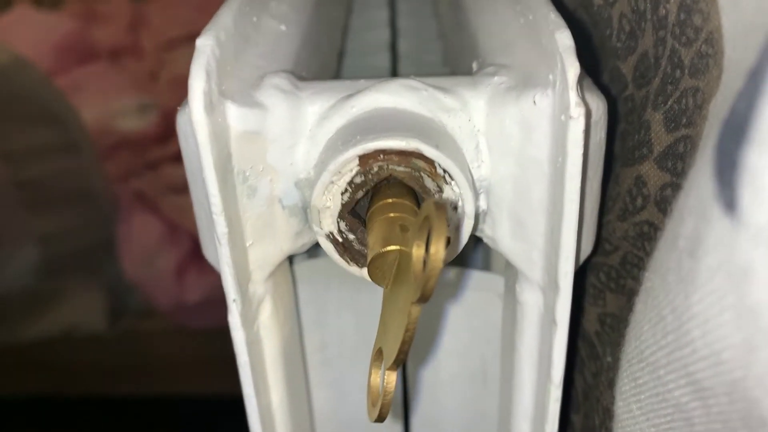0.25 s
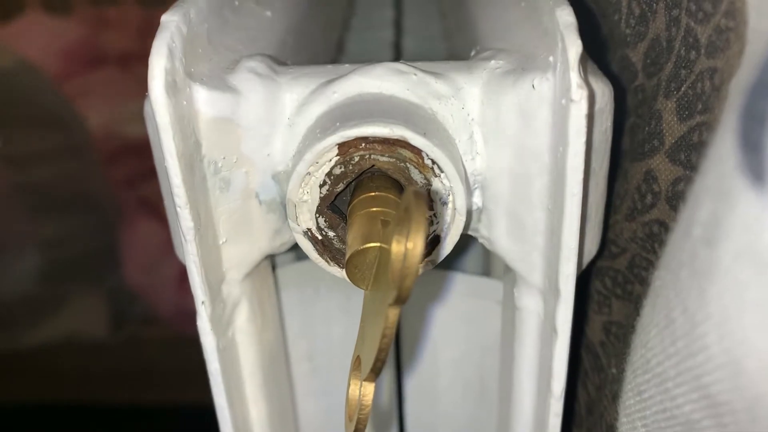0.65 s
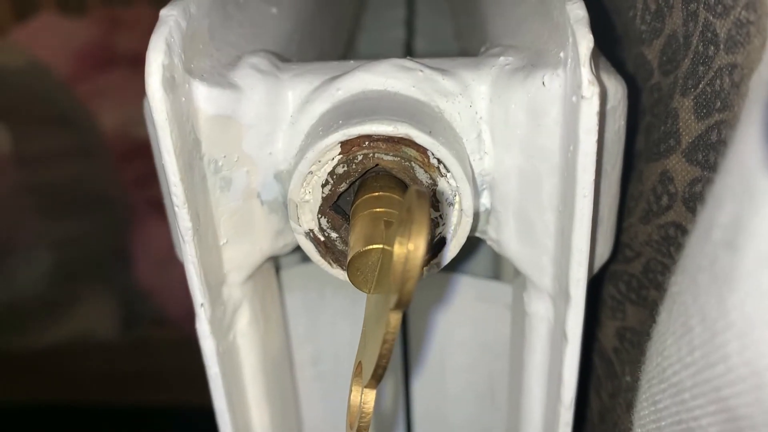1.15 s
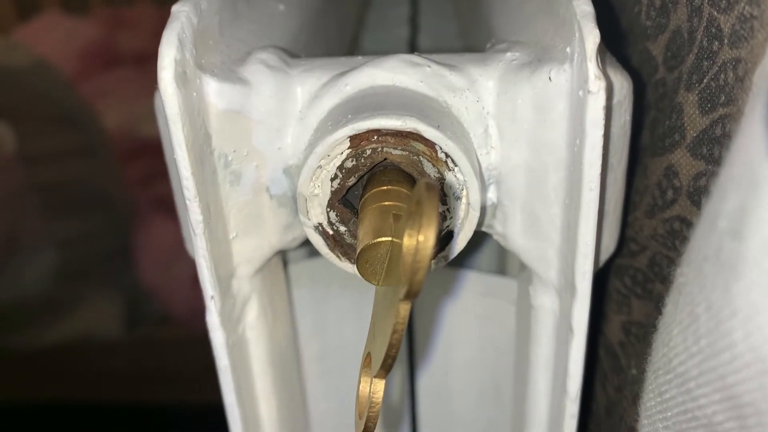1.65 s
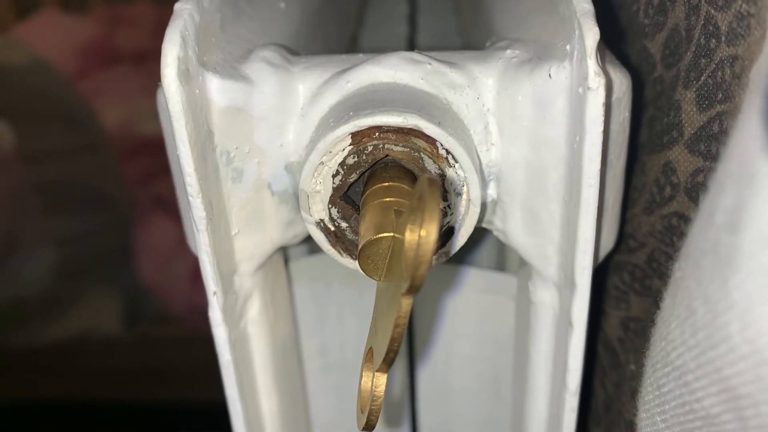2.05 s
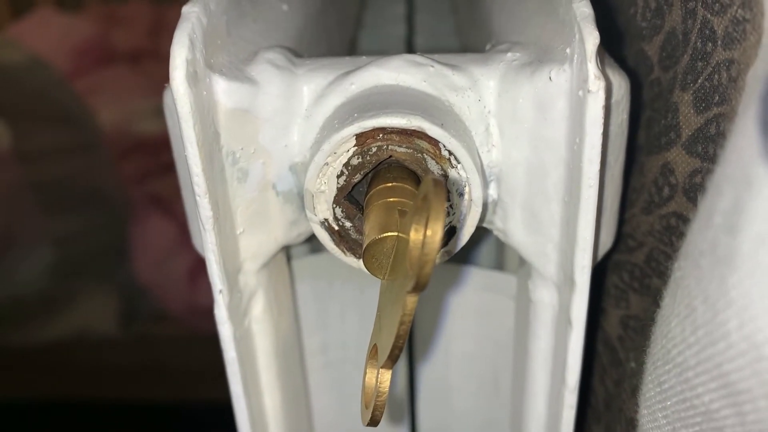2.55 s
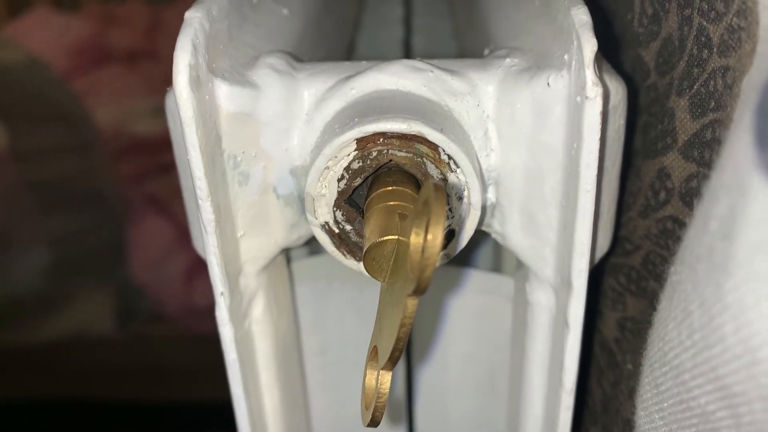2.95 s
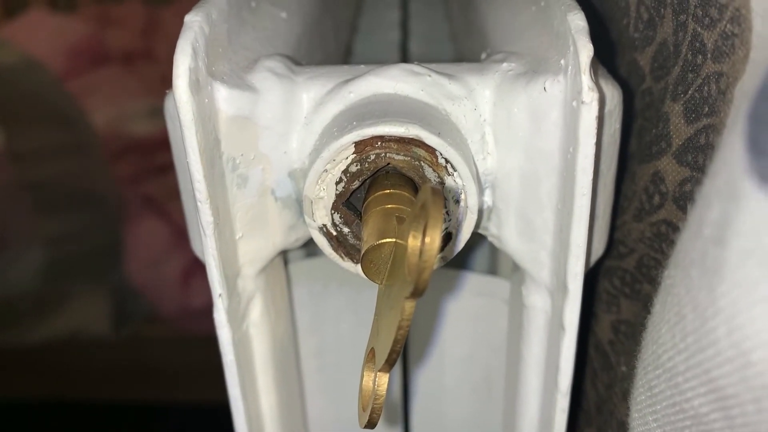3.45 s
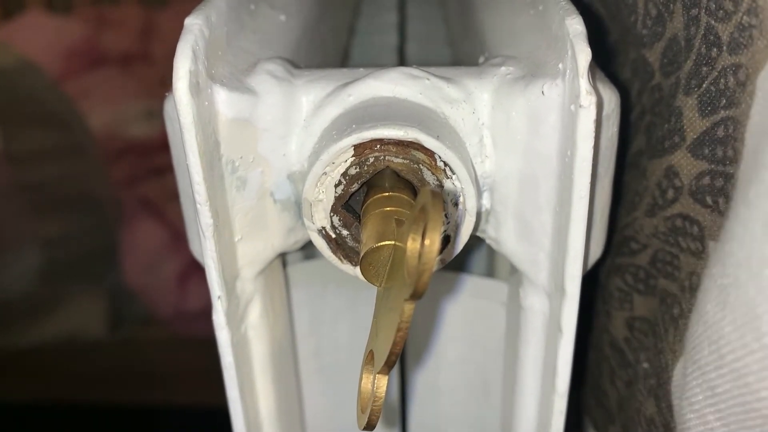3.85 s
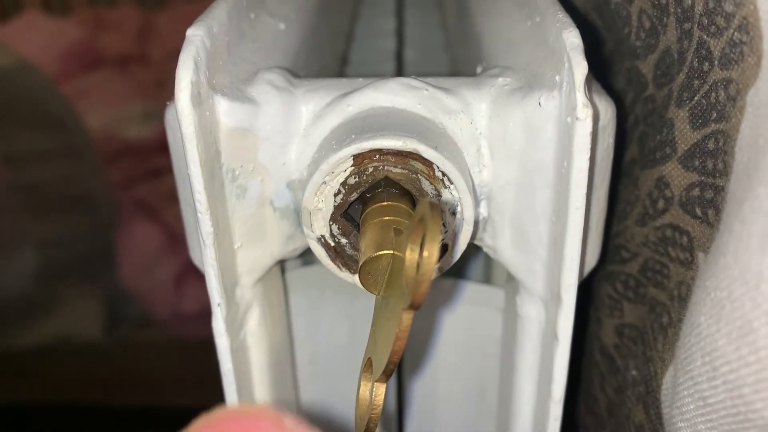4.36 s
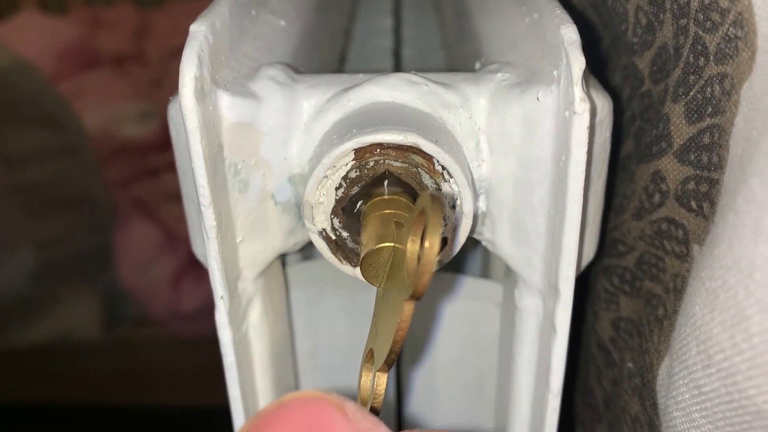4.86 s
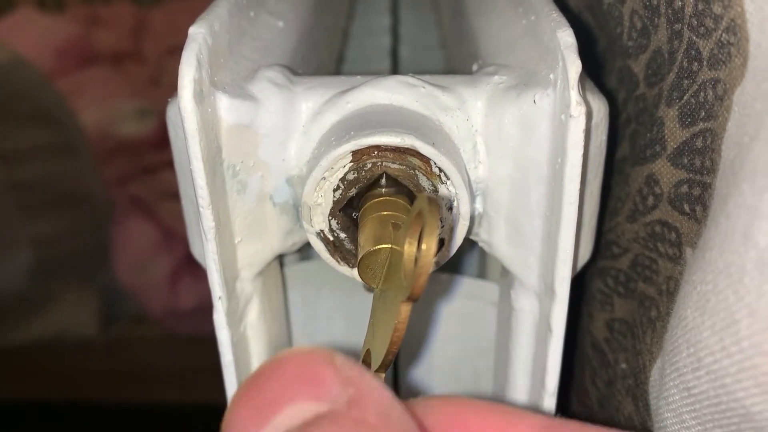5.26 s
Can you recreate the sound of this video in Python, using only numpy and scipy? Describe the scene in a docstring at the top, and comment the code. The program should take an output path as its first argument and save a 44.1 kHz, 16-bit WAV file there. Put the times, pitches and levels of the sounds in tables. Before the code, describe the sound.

Trapped air hisses evenly from a radiator bleed valve, turns grainy and wet, chokes, then sputters out in quick gurgling spits of water.

```python
"""Bleeding a radiator

A radiator is bled through its key valve, a hand's width from the two-port microphone, in a quiet room.
Dry air hisses evenly: noise with a fixed colour. Water wets the slit, and drops snap in it singly.
The hiss turns louder and grainy, from rough noise and drifting resonances, then chokes to a squeeze.
Slugs of water follow, about ten a second: each a resonant gurgle that climbs and ends in a spit of spray."""
import sys
import numpy as np
from scipy import signal
from scipy.fft import rfft, irfft
from scipy.io import wavfile
from scipy.ndimage import uniform_filter1d

SR = 44100
rng = np.random.default_rng(int(sys.argv[2]) if len(sys.argv) > 2 else 0)


def log_audio(samples):
    """Write samples as a 16-bit WAV file to the path given in sys.argv[1]."""
    # one column per channel
    frames = np.atleast_2d(samples).T
    # limit to full scale, then quantise
    limited = np.clip(frames, -1, 1)
    pcm = np.round(limited * 32767).astype(np.int16)
    wavfile.write(sys.argv[1], SR, pcm)


N = 243412
T, HZ = np.arange(N) / SR, np.fft.rfftfreq(N, 1 / SR)
WET_S, LEAK_END_S = 3.358, 4.51  # water reaches the slit; the last leak of air through it ends
SQUEEZE_S, SQUEEZE_END_S = 4.532, 4.651  # air squeezes past a plug of water
SPATTER_DB, SPATTER_DB_PER_S = -56, 2  # spatter out of the valve: level at WET_S, and its growth


def amp(db):
    """Turns dB into a linear gain."""
    return 10 ** (np.asarray(db) / 20)


def unit(x):
    """Scales x to rms 1."""
    return x / np.sqrt(np.mean(x ** 2) + 1e-20)


def curve(rows, axis=1):
    """One column of a time table, drawn as straight lines at every sample."""
    rows = np.asarray(rows)
    return np.interp(T, rows[:, 0], rows[:, axis])


def response(points):
    """Linear gain at every frequency in HZ from (Hz, dB) points."""
    return amp(np.interp(HZ, *np.transpose(points)))


def colour(x, points):
    """Filters x by a spectrum drawn over log frequency; rms 1."""
    hz, db = np.transpose(points)
    gain = amp(np.interp(np.log(HZ + 1), np.log(hz), db))
    return unit(irfft(rfft(x) * gain, N))


def wander(rate_hz):
    """Smooth chance movement up to about a rate; rms 1."""
    lowpass = 1 / np.sqrt(1 + (HZ / rate_hz) ** 4)
    return unit(irfft(rfft(rng.standard_normal(N)) * lowpass, N))


def turbulence(rough_db, rate_hz):
    """Noise whose strength jumps about at random; rms 1."""
    strength = amp(rough_db * np.clip(wander(rate_hz), -2.5, 2.5))
    return unit(rng.standard_normal(N) * strength)


def patchy(x, depth_db, size=128):
    """Each droplet has its own colour: gains that vary over a few milliseconds and a kilohertz or so."""
    overlap = size * 3 // 4
    z = signal.stft(x, nperseg=size, noverlap=overlap)[2]
    across_hz = uniform_filter1d(rng.standard_normal(z.shape), size=4, axis=0)
    patches = unit(uniform_filter1d(across_hz, size=6, axis=1))
    gain = amp(depth_db * np.clip(patches, -2, 2))
    return unit(signal.istft(z * gain, nperseg=size, noverlap=overlap)[1][:N])


def resonate(x, hz, width):
    """A resonance that follows the curve hz: shift it to zero, lowpass, shift back."""
    turn = np.exp(2j * np.pi * np.cumsum(hz * np.ones(len(x))) / SR)
    r = np.exp(-np.pi * width / SR)
    return 2 * (turn * signal.lfilter([1 - r], [1, -r], x / turn)).real


def whistle(x, hz, width):
    """A steep resonance, two in a row, on the curve hz; rms 1."""
    return unit(resonate(resonate(x, hz, width), hz, width))


def steadied(x, size=400):
    """Keeps the fine crackle of x but evens out its strength over longer stretches of samples."""
    return x / np.sqrt(uniform_filter1d(x ** 2, size) + 1e-9)


def opens(s, ramp):
    """A smooth step from 0 to 1 centred on time s."""
    return .5 + .5 * np.tanh((T - s) / ramp)


def held(start, end, rise, fall):
    """Attack, hold and release."""
    return opens(start, rise) * (1 - opens(end, fall))


# Low rumble of the quiet room. Each row: frequency in Hz, relative level in dB per Hz.
ROOM_COLOUR = [(15, -35), (30, -24), (44, 1), (56, 0.5), (72, -3.5), (105, 0.5), (160, -10), (290, -8),
               (380, -18.5), (800, -23.5), (2000, -27)]
# Soft handling bumps at the microphone. Each row: centre in seconds, peak level in dB, frequency in Hz.
HANDLING_BUMPS = [(.73, -52, 72), (2.06, -53, 68.5), (2.449, -47, 71), (4.21, -53.5, 76)]
ROOM_DB = -63.5


def room_tone():
    """Low rumble, almost alike at both ports, with a few soft sine bumps."""
    shared, left, right = (colour(rng.standard_normal(N), ROOM_COLOUR) for _ in range(3))
    bumps = np.zeros(N)
    for s, db, hz in HANDLING_BUMPS:
        swell = np.exp(-((T - s) / 0.024) ** 2)
        bumps += amp(db) * swell * np.sin(2 * np.pi * hz * (T - s))
    return amp(ROOM_DB) * (shared + 0.22 * np.array([left, right])) + bumps


# Hiss of dry air a hand's width away. Each row: frequency in Hz, relative level in dB per Hz.
DRY_AIR_COLOUR = [(1000, -45.5), (1750, -36), (2200, -30.5), (3100, -13), (3600, -16.5), (4100, -8.5),
                  (4800, -10.5), (5300, -20.5), (6100, -22), (7400, 1), (8400, 4.5), (10500, -2),
                  (13500, -5), (14800, 5), (16000, -5.5)]
AIR_DB, AIR_WAVER_DB = -28, 0.4  # the dry hiss holds steady


def dry_air():
    """Even turbulence in the dry slit, until water takes over."""
    hiss = colour(rng.standard_normal(N), DRY_AIR_COLOUR)
    level = amp(AIR_DB + AIR_WAVER_DB * wander(27))
    return hiss * level * (1 - opens(3.39, 0.012))


# Sleeve movements near the microphone. Each row: start in seconds, end in seconds, level in dB.
SLEEVE_RUSTLES = [(0.107, 0.198, -66), (0.318, 0.52, -66.5), (0.523, 0.718, -63.5), (0.803, 1.18, -64),
                  (1.494, 1.692, -75), (1.696, 1.77, -65.5), (2.16, 2.303, -68), (2.328, 2.8, -74)]


def rustle():
    """Sleeves shift softly near the microphone: dull, gently uneven noise."""
    cloth = colour(turbulence(rough_db=1.0, rate_hz=28),
                   [(100, -5), (280, 6.0), (550, 4.0), (900, -2.0), (1600, -3.0), (4000, -68.0)])
    moves = sum(amp(db) * held(start, end, rise=0.054, fall=0.016) for start, end, db in SLEEVE_RUSTLES)
    return cloth * moves


# Spatter at the valve. Each row: frequency in Hz, relative level in dB per Hz.
DROPLET_COLOUR = [(30, -43), (100, -32), (300, -5.5), (800, 12.5), (1600, 3), (3000, -1), (5500, -10),
                  (8000, -3), (11000, 3.5), (16000, -1)]


def spatter():
    """A faint wide crackle of droplets that swells just ahead of the wet jet and keeps growing."""
    droplets = colour(patchy(turbulence(rough_db=3.5, rate_hz=51), depth_db=1.5), DROPLET_COLOUR)
    level = amp(SPATTER_DB + SPATTER_DB_PER_S * (T - WET_S))
    return droplets * level * opens(3.315, 0.02)


# Single drops snapping in the slit. Each row: time in seconds, strength in dB before the colouring.
DROP_SNAPS = [(3.3193, -24), (3.3218, -14), (3.3421, -12), (3.3425, -12.5), (3.3488, -26), (3.3543, -18),
              (3.3685, -15), (3.3928, -16), (3.4505, -19), (4.397, -12), (4.422, -14), (4.4616, -17),
              (4.4808, -21), (5.506, -13)]
SNAP_S = .0008  # decay time constant of one snap


def snaps():
    """First drops tick through the slit one by one as quick noise decays; more burst as it chokes."""
    strength = sum(amp(db) * (T >= s) * np.exp(-abs(T - s) / SNAP_S) for s, db in DROP_SNAPS)
    ticks = strength * rng.choice([-1, 1], N)
    bright = [(0, -45), (800, -30), (3000, -22), (6000, -20), (7800, 5), (9500, 5), (12000, 0), (16000, -1)]
    return irfft(rfft(ticks) * response(bright), N)


WASH_DB = -3.5  # level of the scattered rush against the direct spatter


def wash():
    """The low rush of the spatter, scattered by the radiator and different at each port."""
    low = [(100, -34), (380, -13), (620, 3.5), (1150, 4.5), (1700, 7.0), (2300, -28), (4000, -30),
           (16000, -40)]
    rush = np.array([colour(turbulence(rough_db=5.5, rate_hz=39), low) for _ in range(2)])
    level = amp(SPATTER_DB + WASH_DB + SPATTER_DB_PER_S * (T - WET_S))
    return rush * level * opens(3.32, 0.028)


# Body of the wet jet. Each row: frequency in Hz, relative level in dB per Hz.
WET_JET_COLOUR = [(1700, -36.5), (2400, -62), (3000, -23), (3600, -31), (4600, -30), (6100, -28),
                  (7400, -2.5), (8300, 0), (9600, -1.5), (11000, -11), (13000, -21), (16000, -19)]
# Times when the wet slit is open. Each row: start in seconds, end in seconds.
SLIT_OPEN = [(3.3, 4.399), (4.417, 4.429), (4.448, 4.502)]
# Fuzzy whistle of the slit, sinking and swelling as water narrows it.
# Each row: time in seconds, pitch in Hz, level in dB.
SLIT_WHISTLE = [(3.38, 15000, -28), (3.48, 15100, -25.5), (3.6, 14700, -23.5), (3.69, 14600, -22),
                (3.76, 14600, -24), (3.8, 15220, -28), (3.9, 14700, -22), (4.0, 14900, -27),
                (4.09, 14400, -32), (4.16, 14300, -24), (4.19, 14500, -30), (4.24, 14500, -29),
                (4.3, 14800, -37), (4.49, 13700, -32)]
# Narrower resonance of the valve mouth. Each row: time in seconds, pitch in Hz, level in dB.
MOUTH_WHISTLE = [(3.38, 8100, -23), (3.45, 8080, -26), (3.51, 7830, -27.5), (3.59, 8300, -22),
                 (3.67, 8650, -34), (3.76, 8050, -24), (3.85, 8450, -38), (4.04, 8350, -25),
                 (4.14, 8400, -27.5), (4.17, 7600, -26), (4.23, 7870, -24.5), (4.3, 7760, -30),
                 (4.42, 7700, -28), (4.48, 7700, -25)]
# Water films shredding into fine spray in the slit. Each row: start in seconds, end in seconds, level in dB.
WATER_FILMS = [(3.658, 3.762, -28), (3.865, 4.118, -29.5), (4.11, 4.18, -24.5), (4.225, 4.443, -25.5),
               (4.45, 4.507, -29.5)]
# Spray of those films. Each row: frequency in Hz, relative level in dB per Hz.
FILM_SPRAY_COLOUR = [(7000, -35), (9500, -2), (11000, 3), (12600, 1.5), (13600, -8), (16000, -10)]
JET_DB, JET_SAG_DB = -22, -1.5  # body of the wet jet, and its change by the time it chokes
GATHER_POWER = 2.1  # water gathers in the slit slowly at first, then fast
PINCH_S, PINCH_WIDTH_S, PINCH_DB = 4.178, 0.024, -4  # water briefly pinches the jet
LEAK_DB = -17.5  # a little air still gets past while the slit is choked


def wet_jet(slit_width_hz=1900, mouth_width_hz=600):
    """Water makes the jet grainy, moves the fuzzy whistles of slit and mouth, and at last chokes it."""
    water = np.clip((T - WET_S) / (SLIT_OPEN[-1][1] - WET_S), 0, 1) ** GATHER_POWER
    pinch_db = PINCH_DB * np.exp(-((T - PINCH_S) / PINCH_WIDTH_S) ** 2)
    grain = patchy(turbulence(rough_db=2.2, rate_hz=1400), depth_db=1.0)
    body = colour(grain, WET_JET_COLOUR) * amp(JET_DB + JET_SAG_DB * water + pinch_db)

    slit = whistle(turbulence(rough_db=1.0, rate_hz=640), curve(SLIT_WHISTLE), slit_width_hz)
    slit = colour(slit, [(6000, -30), (12000, 3), (16000, -3)]) * amp(curve(SLIT_WHISTLE, axis=2))
    mouth = whistle(rng.standard_normal(N), curve(MOUTH_WHISTLE), mouth_width_hz)
    mouth = mouth * amp(curve(MOUTH_WHISTLE, axis=2))

    spray = colour(turbulence(rough_db=2.5, rate_hz=900), FILM_SPRAY_COLOUR)
    films = spray * sum(amp(db) * held(start, end, rise=0.016, fall=0.0071)
                        for start, end, db in WATER_FILMS)

    flutter = amp(0.85 * wander(70))
    ragged = steadied(amp(3 * np.clip(wander(700), -2, 1.7)))
    sputter = 1 + opens(4.39, .01) * (ragged - 1)  # only near the choking
    gate = sum(held(start, end, rise=0.0015, fall=0.00085) for start, end in SLIT_OPEN)
    leak = amp(LEAK_DB) * held(WET_S, LEAK_END_S, rise=.01, fall=.0015)
    gate = np.maximum(gate, leak)
    return (body + slit + mouth + films) * flutter * sputter * opens(WET_S, 0.014) * gate


# Two hollow resonances of the valve bore; the upper fades as it fills.
# Each row: time in seconds, level of the lower in dB, level of the upper in dB.
BORE_LEVELS = [(3.33, -60, -60), (3.38, -47, -45), (3.55, -47.5, -50), (3.74, -51, -46), (3.82, -49, -52),
               (3.95, -46, -57), (4.2, -48, -63), (4.35, -51.5, -66), (4.5, -45.5, -56)]


def bore(lower_hz=3030, lower_width_hz=800, upper_hz=4350, upper_width_hz=900, slosh_share=0.026):
    """The wet jet sounds the hollow bore of the valve; sloshing water makes its two resonances waver."""
    slosh = 1 + slosh_share * wander(35)
    lower = whistle(turbulence(rough_db=1.5, rate_hz=65), lower_hz * slosh, lower_width_hz)
    upper = whistle(turbulence(rough_db=2, rate_hz=50), upper_hz * slosh, upper_width_hz)
    hollow = lower * amp(curve(BORE_LEVELS)) + upper * amp(curve(BORE_LEVELS, axis=2))
    return hollow * held(WET_S, LEAK_END_S, rise=.01, fall=.002)


PATTER_S, PATTER_DB = 3.97, -60.5  # water starts to land on cloth below


def patter():
    """The dull, uneven sound of the water landing on cloth."""
    thuds = colour(turbulence(rough_db=4.0, rate_hz=53),
                   [(30, -33), (90, -28), (180, 6.5), (330, -3.5), (600, 1.0), (1500, -46), (5000, -71)])
    return thuds * amp(PATTER_DB) * opens(PATTER_S, 0.037)


def reopenings(from_hz=2900, to_hz=8000, length_s=0.0162, lead_s=0.012, level_db=-38, width_hz=1400):
    """Each time the choked slit blows clear, a ragged bubble chirps upward."""
    out = np.zeros(N)
    kicks = turbulence(rough_db=4, rate_hz=400)
    slosh = 1 + .08 * wander(250)
    for start, _ in SLIT_OPEN[1:]:
        span = (T >= start - lead_s) & (T < start - lead_s + length_s)
        climb = np.linspace(0, 1, span.sum()) ** 1.7
        hz = from_hz * (to_hz / from_hz) ** climb * slosh[span]
        out[span] += whistle(kicks[span], hz, width_hz) * signal.windows.tukey(len(hz), .3)
    return amp(level_db) * out


# Larger bubbles that ring as they burst. Each row: start in seconds, starting pitch in Hz, peak level in dB.
BURSTING_BUBBLES = [(4.439, 3050, -34), (4.719, 4700, -30), (4.7995, 3500, -35), (4.819, 1620, -36),
                    (4.924, 2250, -43), (4.934, 3250, -29), (5.025, 2950, -34), (5.111, 2300, -36),
                    (5.1755, 2290, -31.5), (5.233, 3050, -32), (5.286, 2750, -35), (5.316, 2260, -29),
                    (5.379, 4800, -21), (5.402, 1830, -45), (5.453, 3200, -30.5), (5.4725, 4830, -23.5),
                    (5.4945, 3760, -26)]


def bubbles(swell_s=0.00088, rise_per_s=3):
    """Each larger bubble rings for a few milliseconds, rising a little in pitch."""
    out, t = np.zeros(N), T[:SR // 40]
    ring = t / swell_s * np.exp(1 - t / swell_s)
    for (s, hz, db), phase in zip(BURSTING_BUBBLES, rng.random(len(BURSTING_BUBBLES))):
        cycles = hz * t * (1 + rise_per_s * t / 2) + phase
        part = out[round(s * SR):][:len(t)]  # a view: adding here adds to out
        part += (amp(db) * ring * np.sin(2 * np.pi * cycles))[:len(part)]
    return out


# The gurgle that leads up to each spit. Each row: time of the lowest pitch in seconds, lowest pitch in Hz,
# time of the highest pitch in seconds, highest pitch in Hz, level at the highest pitch in dB.
GURGLE_CLIMBS = [(4.672, 1300, 4.721, 4500, -38.5), (4.762, 2020, 4.799, 4370, -38.5),
                 (4.822, 1600, 4.875, 4350, -40), (4.915, 2050, 4.972, 5230, -39),
                 (5.006, 2140, 5.068, 5230, -36.5), (5.098, 1880, 5.169, 4840, -36),
                 (5.198, 2080, 5.276, 4640, -35), (5.313, 2140, 5.383, 4820, -31.5),
                 (5.404, 1780, 5.492, 4900, -32)]
# The outlet colours every gurgle. Each row: frequency in Hz, gain in dB.
OUTLET_GAIN = [(1200, 4.5), (1650, -2.5), (2150, -8.5), (3050, -3.5), (3700, -5.5), (4700, -3.5), (6000, 0),
               (13000, -3.5)]
PLUG_S, PLUG_HZ, PLUG_DB = 4.505, 1650, -48  # the first plug of water burbles as it seals the slit
REFILL_S = 0.0076  # after a spit the pocket grows again and its pitch drops back


def gurgles(width_hz=470, bend=1.38, swell_db=6.0, overtone=4.2, overtone_db=-13, froth_db=-6.5,
            froth_width_hz=2200):
    """The outlet's air pocket shrinks, so its bubble-kicked resonances climb; it refills. Froth blurs them."""
    pitch = np.full(N, float(GURGLE_CLIMBS[0][1]))
    followers = [*GURGLE_CLIMBS[1:], GURGLE_CLIMBS[-1]]
    for (low_s, low_hz, top_s, top_hz, _), following in zip(GURGLE_CLIMBS, followers):
        progress = np.clip((T - low_s) / (top_s - low_s), 0, 1)
        climb = low_hz + (top_hz - low_hz) * progress ** bend
        refill = following[1] + (top_hz - following[1]) * np.exp(-abs(T - top_s) / REFILL_S)
        pitch = np.where(T < low_s, pitch, np.where(T < top_s, climb, refill))

    slosh = 1 + .045 * wander(160)
    kicks, fizz = turbulence(rough_db=5, rate_hz=300), turbulence(rough_db=6, rate_hz=400)
    pocket = steadied(whistle(kicks, pitch * slosh, width_hz), size=900)
    froth = amp(froth_db) * whistle(fizz, 1.25 * pitch, froth_width_hz)
    high = amp(overtone_db) * whistle(fizz, np.minimum(overtone * pitch * slosh, 13000), 2200)

    octaves = np.log2(pitch / curve(GURGLE_CLIMBS, axis=3))  # distance from the highest pitch
    swell = amp(curve(GURGLE_CLIMBS, axis=4) + swell_db * octaves) * opens(SQUEEZE_END_S, 0.0018)
    plug = whistle(kicks, PLUG_HZ * slosh, width_hz) * amp(PLUG_DB)
    plug = plug * held(PLUG_S, SQUEEZE_S, rise=0.0033, fall=.004)
    return irfft(rfft((pocket + froth + high) * swell + plug) * response(OUTLET_GAIN), N)


# Air squeezing past water. Each row: frequency in Hz, relative level in dB per Hz.
SQUEEZED_AIR_COLOUR = [(1800, -33), (2600, -12), (3050, 2.5), (3400, -3), (3900, -10), (5000, -17),
                       (6200, -25.5), (7700, 6.5), (9300, -7.5), (10500, -8), (12500, -31), (16000, -24)]
SQUEEZE_DB = -33


def squeeze():
    """A duller, weaker, crackling hiss through the nearly blocked outlet."""
    hiss = colour(patchy(turbulence(rough_db=4.0, rate_hz=660), depth_db=0.5), SQUEEZED_AIR_COLOUR)
    level = amp(SQUEEZE_DB + 0.64 * wander(40))
    return hiss * level * held(SQUEEZE_S, SQUEEZE_END_S, rise=0.0018, fall=0.0017)


CLICKS_PER_S, CLICK_DB = 790, -4  # tiny bubbles snapping within the spits


def crackle(pops):
    """Wet noise, broken into pops, with sharp snaps scattered through it."""
    clicks = (rng.random(N) < CLICKS_PER_S / SR) * rng.choice([-1, 1], N)
    wet = unit(pops * patchy(rng.standard_normal(N), depth_db=5.5))
    return wet + amp(CLICK_DB) * unit(clicks)


# Slugs of water, each ending in a spit. Each row: spit in seconds, length in seconds, level in dB,
# share of fine spray from 0 to 1, length of the sizzle before it in seconds, sizzle level in dB.
WATER_SLUGS = [(4.6998, 0.015, -21.5, 0.04, .01, -53), (4.782, 0.016, -24.5, 0.06, .005, -40),
               (4.8652, 0.01, -19, 0.92, 0.013, -42), (4.951, .020, -23.5, .25, 0.013, -46),
               (5.06, 0.014, -23.5, 0.21, 0.032, -43), (5.147, 0.025, -26, .2, 0.02, -41),
               (5.266, 0.0094, -18.5, 0.07, 0.035, -39.5), (5.3634, 0.024, -25, 0.2, .026, -45),
               (5.4847, 0.013, -10.5, 1, .036, -44)]
# Stray drops spat out around the slugs.
# Each row: start in seconds, length in seconds, level in dB, share of fine spray from 0 to 1.
STRAY_DROPS = [(4.716, 0.0069, -26.5, 0.1), (4.727, .007, -37, .1), (4.796, 0.0065, -34, .1),
               (4.8605, 0.0035, -21, 0.3), (4.8875, 0.0053, -31, 0), (4.985, 0.0029, -33, 0.1),
               (5.05, 0.0086, -27.5, 0.4), (5.081, 0.005, -30.5, .6), (5.2585, 0.0047, -28.5, .4),
               (5.275, 0.0036, -27, 0.3), (5.286, .004, -40, .5), (5.294, .008, -36, 0.9),
               (5.362, 0.0031, -20, 1), (5.408, .005, -43, 1), (5.462, .004, -35, 1),
               (5.471, 0.011, -35, 0.9), (5.4815, 0.0034, -15.5, 0.66), (5.497, 0.0036, -25, 0.8),
               (5.5068, 0.0039, -17, 0.8), (5.511, .012, -39, .6)]
# Coarse part of a spit. Each row: frequency in Hz, relative level in dB per Hz.
COARSE_COLOUR = [(1700, -41), (3000, -17.5), (4700, -12), (6000, -17.5), (7600, 7), (8500, 7), (10200, -18),
                 (11300, -34), (12500, -6), (14000, -10), (16000, -13)]
# Fine spray of a spit. Each row: frequency in Hz, relative level in dB per Hz.
FINE_COLOUR = [(2000, -41), (4700, -16), (6000, -19), (8500, 1), (11500, 8), (12600, 5), (14500, 0),
               (16000, -22)]


def spits(rise=0.001, fall=0.00091, skirt_db=-13, skirt_s=0.0033):
    """Each slug sizzles, bursts into a crackle of coarse drops and fine spray, trails off among drops."""
    bursts = [(amp(db) * held(s, s + length, rise, fall), share) for s, length, db, share in STRAY_DROPS]
    for s, length, db, share, sizzle_s, sizzle_db in WATER_SLUGS:
        skirt = amp(skirt_db) * opens(s, rise) * np.exp(-np.maximum(T - s - length, 0) / skirt_s)
        sizzle = amp(sizzle_db) * held(s - sizzle_s, s, rise=0.0023, fall=fall)
        burst = amp(db) * np.maximum(held(s, s + length, rise, fall), skirt)
        bursts.append((burst + sizzle, share))
    # the share divides power, so overlapping bursts add as noises do
    coarse = np.sqrt(sum(burst ** 2 * (1 - np.clip(share, 0, 1)) for burst, share in bursts))
    fine = np.sqrt(sum(burst ** 2 * np.clip(share, 0, 1) for burst, share in bursts))
    pops = amp(4.5 * np.clip(wander(600), -2, 1.5))
    drops = steadied(colour(crackle(pops), COARSE_COLOUR))
    spray = steadied(colour(crackle(pops), FINE_COLOUR))
    return coarse * drops + fine * spray


# Phase by which the left port lags the right. Each row: frequency in Hz, lag in radians.
LEFT_LAG = [(0, 0), (350, .3), (600, 2.0), (950, 3.1), (1300, 4.0), (1700, 6.3), (2250, 9.4), (3050, 12.5),
            (3650, 15.7), (4400, 18.8), (5300, 22), (5900, 25.1), (6600, 26.6), (7700, 26.7),
            (12500, 25.13), (16000, 25.13)]
# How much louder the left port hears the valve. Each row: frequency in Hz, difference in dB.
LEFT_TILT = [(300, 0), (700, -2.5), (1200, -4.5), (1750, -3.5), (2200, 0), (2800, 1.5), (3500, 1.5),
             (4200, 0), (4900, 4), (6000, 0), (16000, 0)]


def ports(x):
    """The valve reaches the two microphone ports out of step and unequally."""
    lag = np.interp(HZ, *np.transpose(LEFT_LAG))
    tilt = np.sqrt(response(LEFT_TILT))  # half the dB on each side
    return irfft(rfft(x) * np.array([tilt * np.exp(-1j * lag), 1 / tilt]), N)


# Strength of the echoes against the direct sound. Each row: frequency in Hz, gain in dB.
ECHO_GAIN = [(200, -12), (1000, -7), (1700, -6), (2500, -4), (4500, -7), (6000, -5), (7500, -11),
             (10500, -11), (12500, -24), (16000, -30)]


def reflections(x, near_t60=.03, near_db=-1, room_db=-8, room_t60=.2):
    """Quick echoes off the radiator and wall, then a short tail, coloured by ECHO_GAIN."""
    t = T[:SR // 2]
    near, far = rng.standard_normal((2, 2, len(t))) * (t > .001)
    near, far = near * amp(-60 * t / near_t60), far * amp(-60 * t / room_t60)
    echo = amp(near_db) * near / np.linalg.norm(near[0]) + amp(room_db) * far / np.linalg.norm(far[0])
    coloured = irfft(rfft(x) * response(ECHO_GAIN), N)
    return signal.fftconvolve(coloured[None], echo, axes=1)[:, :N]


def scene():
    """Everything from the valve passes the ports and the room; wash, rustle and rumble are added."""
    valve = dry_air() + spatter() + snaps() + wet_jet() + bore() + patter()
    valve = valve + reopenings() + bubbles() + gurgles() + squeeze() + spits()
    return ports(valve) + reflections(valve) + wash() + rustle() + room_tone()


EDGE_HZ = 15850  # upper band limit of the recorder


def record(dry):
    """The loudest peaks are rounded off; then the recorder's band limit."""
    rounded = dry / (1 + (dry / .95) ** 4) ** .25
    lowpass = signal.firwin(511, EDGE_HZ, window=("kaiser", 9), fs=SR)
    return signal.oaconvolve(rounded, lowpass[None], "same")


dry = scene()
out = record(dry)
log_audio(out)
```